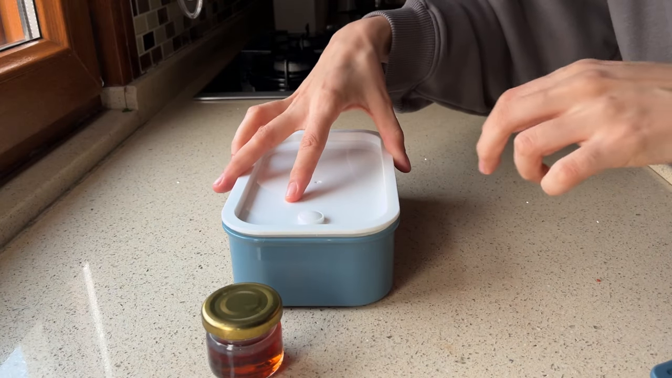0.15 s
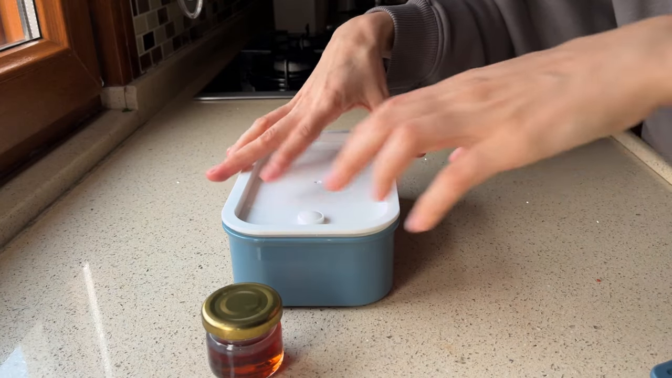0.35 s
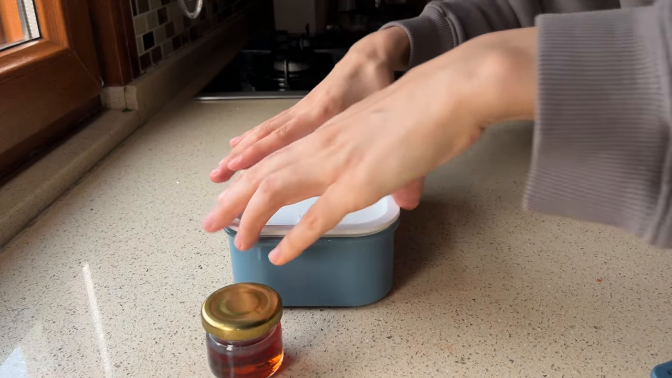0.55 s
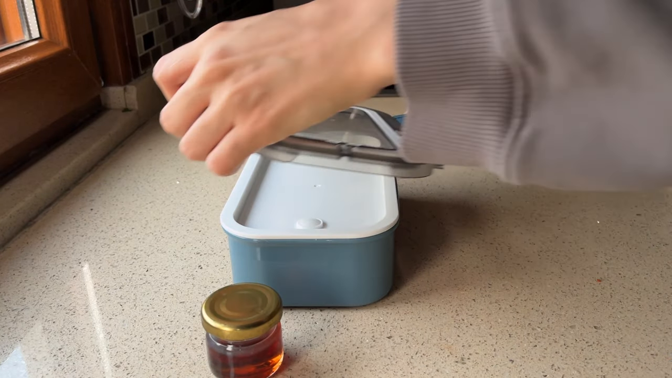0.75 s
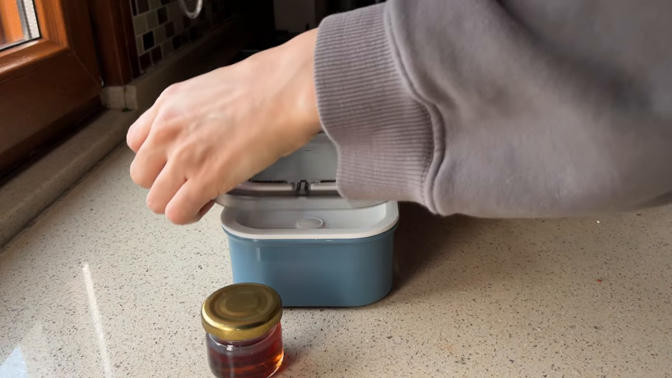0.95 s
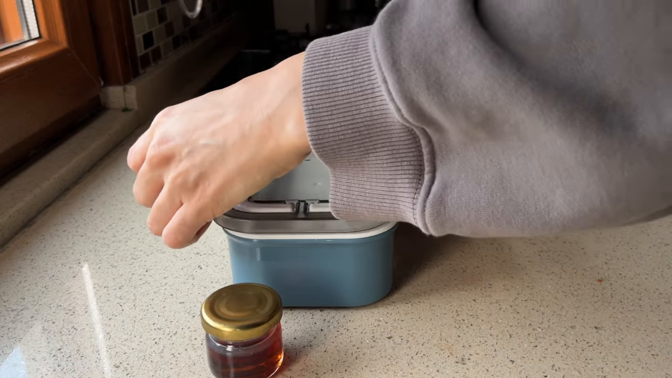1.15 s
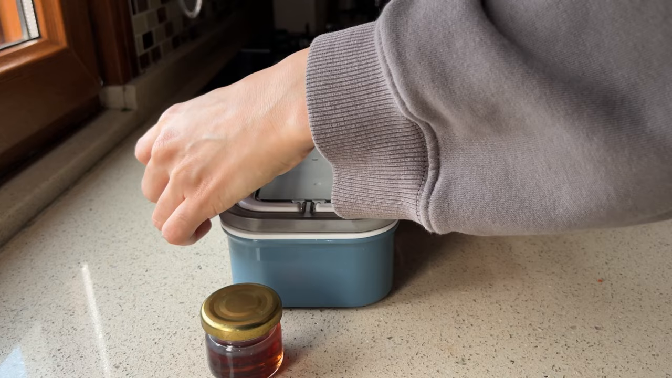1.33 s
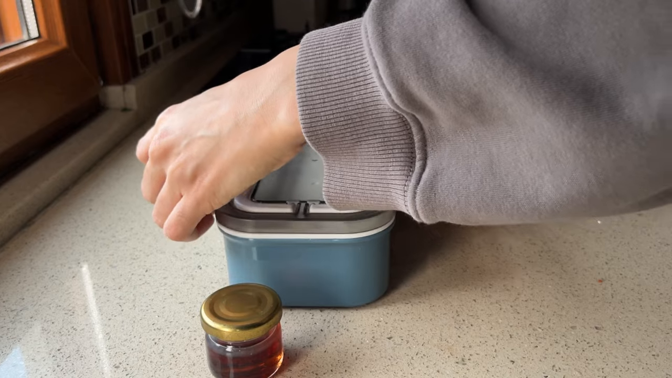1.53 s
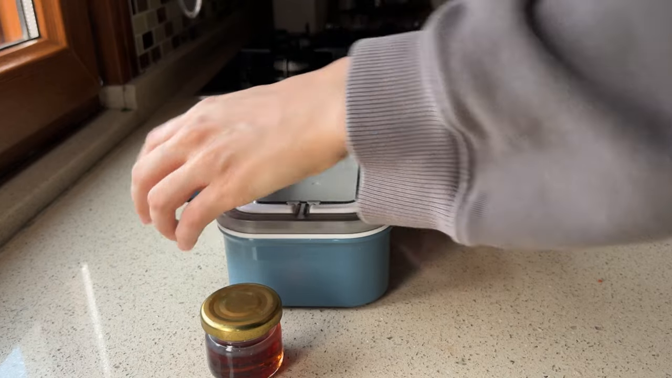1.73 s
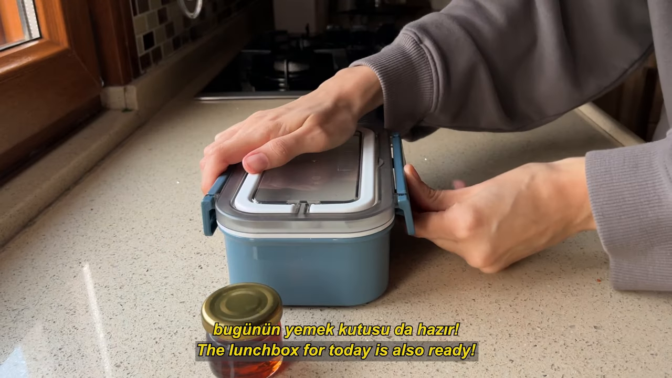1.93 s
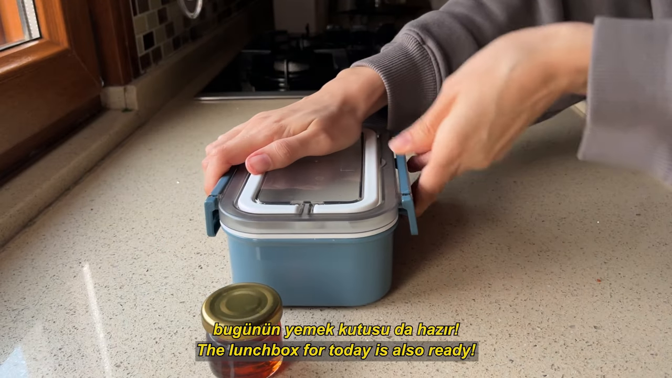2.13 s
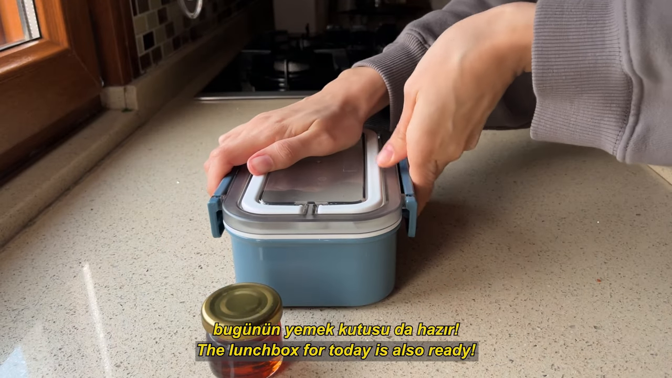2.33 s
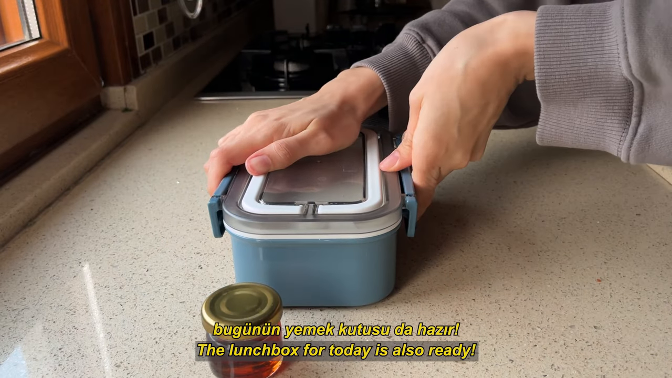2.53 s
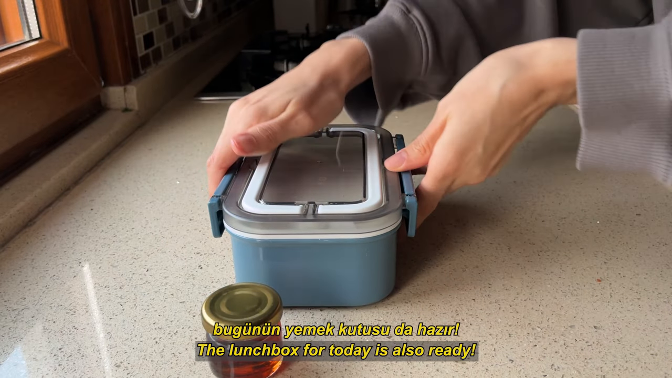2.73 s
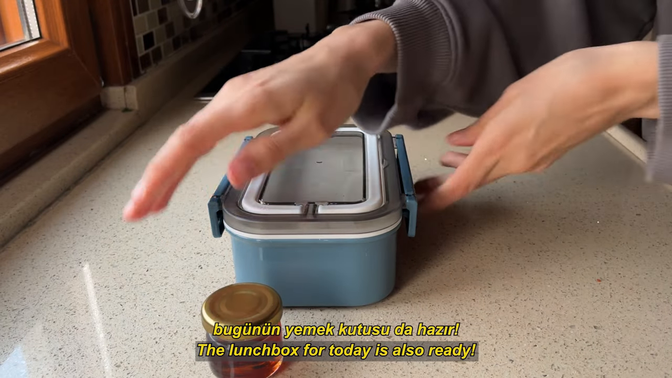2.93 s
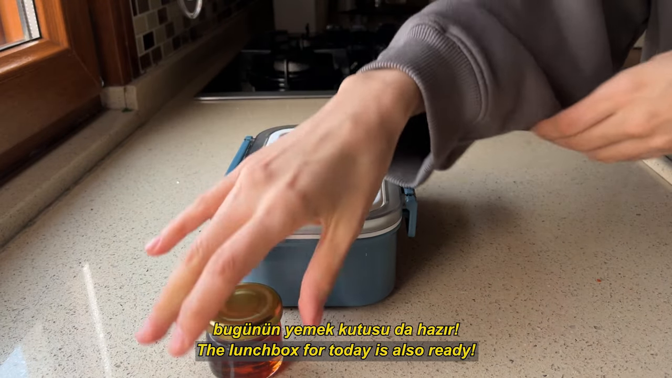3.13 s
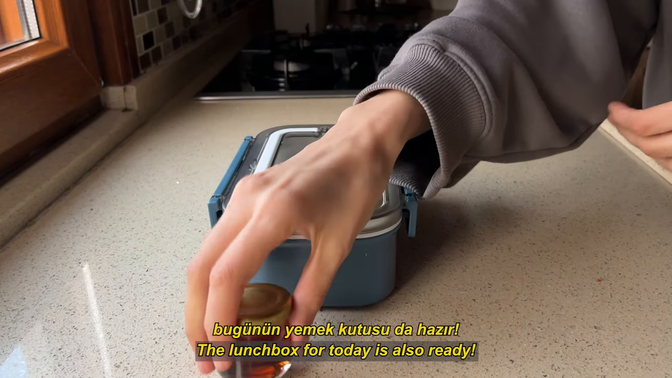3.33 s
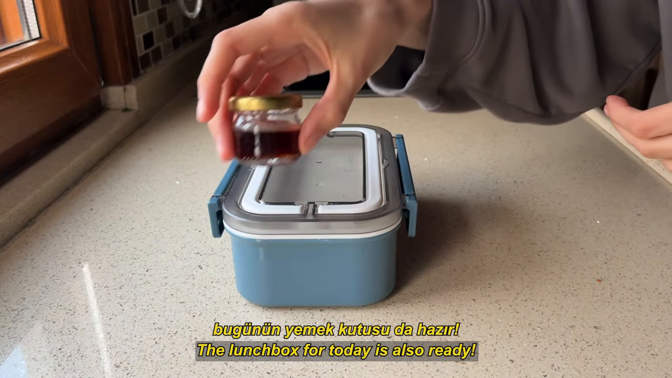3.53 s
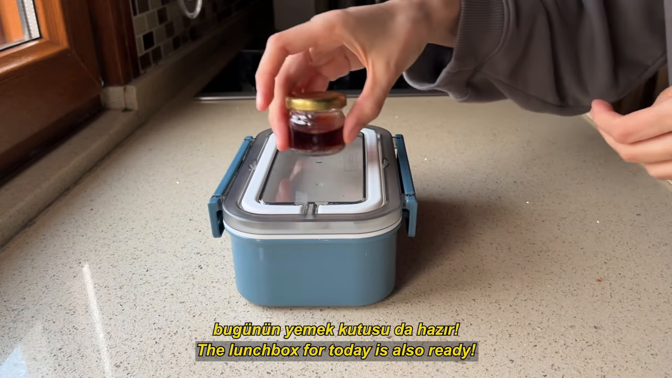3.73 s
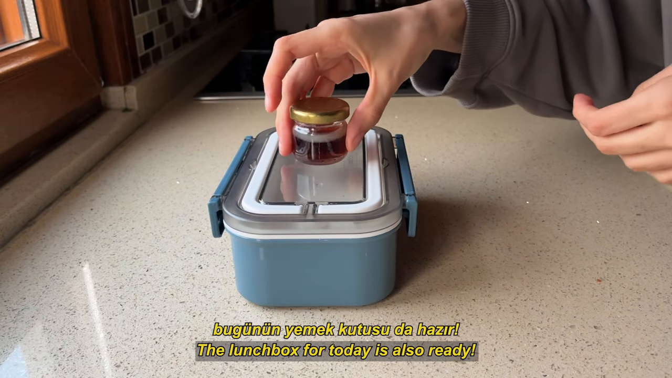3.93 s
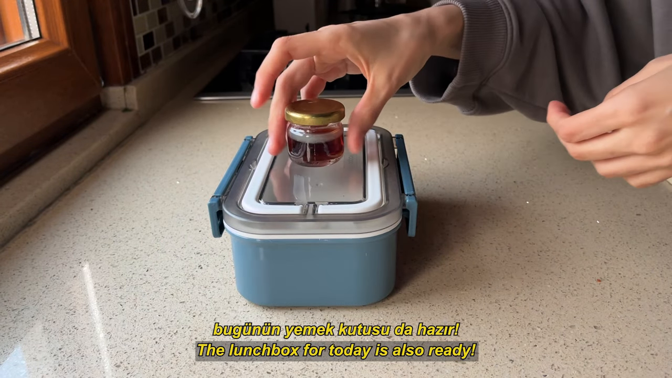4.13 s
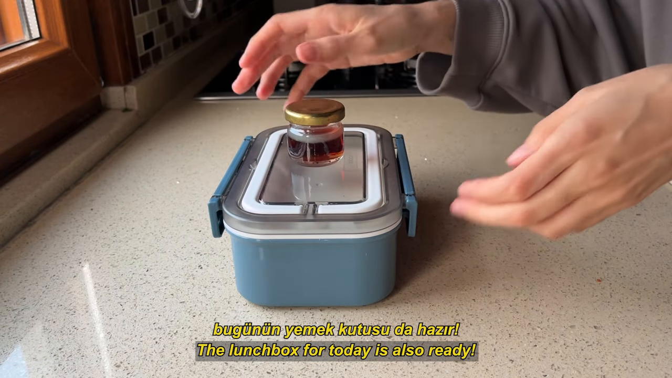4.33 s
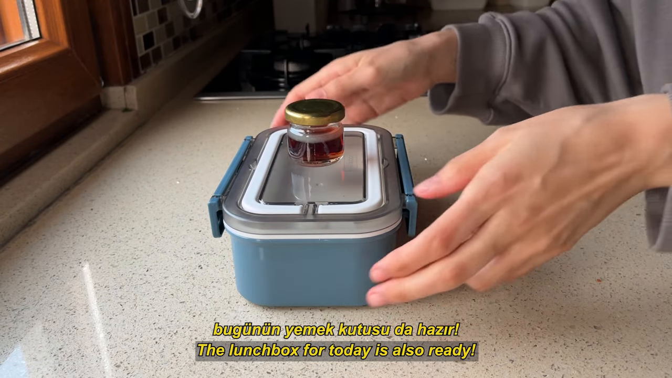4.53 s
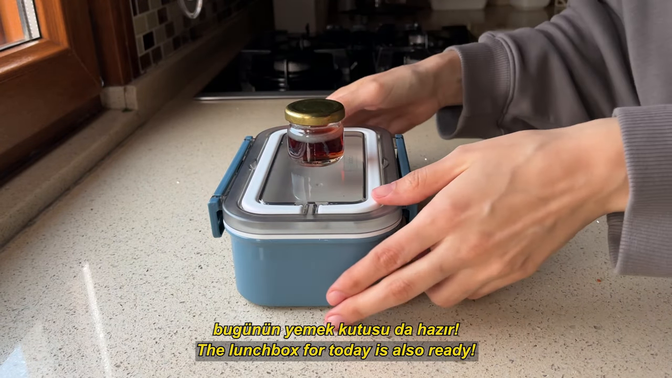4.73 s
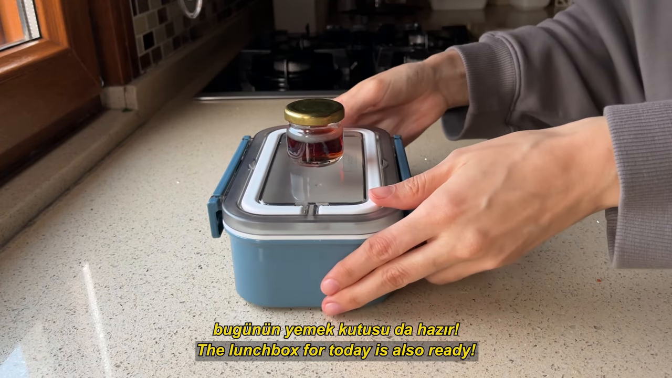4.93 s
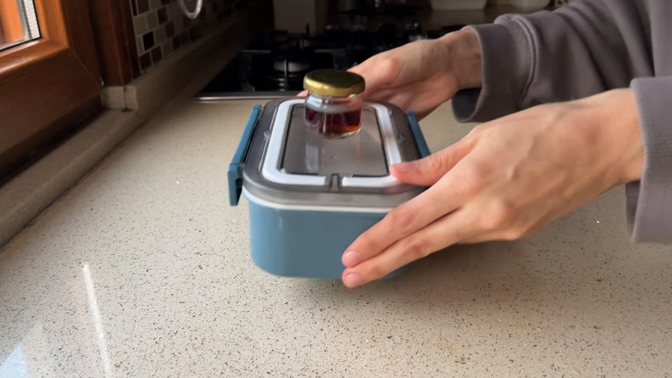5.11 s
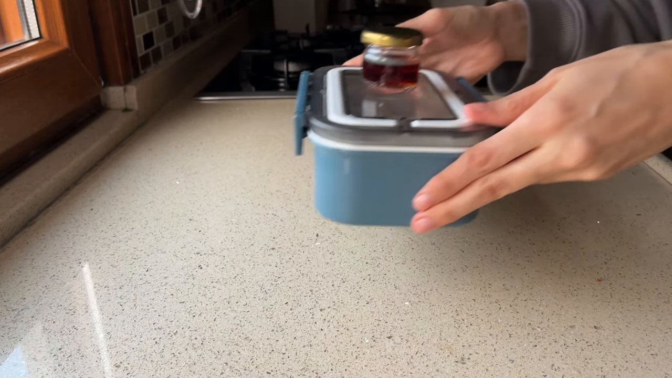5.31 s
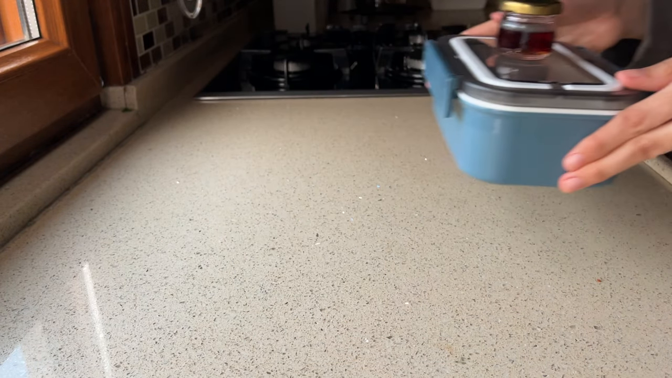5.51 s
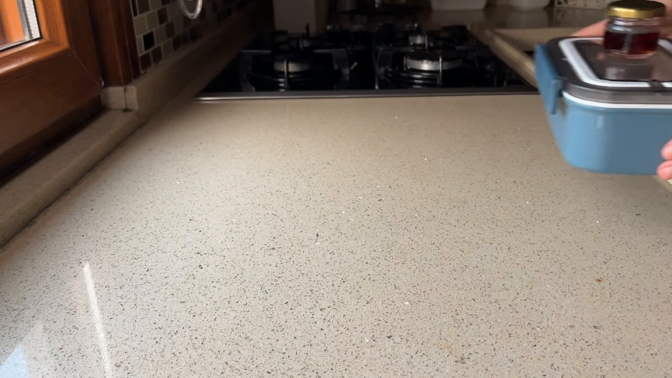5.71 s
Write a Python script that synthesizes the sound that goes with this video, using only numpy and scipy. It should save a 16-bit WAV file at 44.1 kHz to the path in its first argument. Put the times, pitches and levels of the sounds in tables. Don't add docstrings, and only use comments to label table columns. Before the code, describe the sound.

Close stereo handling sounds in a small, briefly reverberant kitchen over soft appliance rumble: dull plastic taps, a hollow lid clatter, a firm clack as it seats, slight rubs and creaks, sharp latch clicks and a dominant snap. Then quiet, a short gritty jar drag on stone, a double knock and rocking on the hollow box, and barely audible bumps as it is carried away.

```python
import sys
import numpy as np
from scipy import signal
from scipy.fft import rfft, irfft, next_fast_len
from scipy.io import wavfile

SR = 44100
rng = np.random.default_rng(int(sys.argv[2]) if len(sys.argv) > 2 else 0)


def invert_db(level):
    return 10 ** (np.asarray(level, dtype=float) / 20)


def unload_audio(sound):
    columns = np.transpose(np.atleast_2d(sound))
    steps = np.round(np.clip(columns, -1, 1) * 32767)
    wavfile.write(sys.argv[1], SR, steps.astype(np.int16))


N = 254456

# start in seconds, knock, thump and crack peaks in dB, treble in dB above the crack.
TRAY_TOUCHES = [(0.0198, -29, -45, -49, -24), (0.0262, -33.5, -63, -38.5, -24),
                (0.031, -27.5, -35.5, -60, -33), (0.0558, -30, -38, -49.5, -38),
                (0.1442, -54, -43.5, -75, -12.0), (0.1636, -57, -44, -50.5, -12),
                (0.1672, -35.5, -47, -53.5, -29), (0.337, -62, -50, -79, -1),
                (0.5427, -49.5, -46.5, -88, 5), (0.764, -58, -62, -90, -6.2),
                (0.7864, -60, -66, -62.5, 2.5)]
# frequency in Hz, level in dB, t60 in seconds.
TRAY_MODES = [(182, -3, 0.11), (300, 11, 0.025), (430, 4.5, 0.018), (617, 4.5, 0.041), (920, 6.5, 0.014),
              (1280, 8.5, 0.0079), (1910, 7, 0.013)]


def tray_settles():
    return contacts(TRAY_TOUCHES, TRAY_MODES, crack_s=0.02, push_s=0.00022, focus=1.0, scatter_db=4.5,
                    spread=0.043, best_hz=920)


# start in seconds, knock, thump and crack in dB, treble in dB above the crack.
LOOSE_TOUCHES = [
    (1.0448, -24, -37.5, -36, -12),
    (1.0732, -33.5, -33, -45, -3),
    (1.0904, -31, -38.5, -52, -14),
    (1.1042, -23.5, -48, -29, -3.5),
    (1.111, -41, -27, -38, -10),
    (1.12, -47, -52, -61, -15),
    (1.149, -69, -52, -71, -21.5),
    (1.1912, -41.5, -40, -66, 2),
    (1.228, -39, -35.5, -47, -13),
]
# frequency in Hz, level in dB, t60 in seconds.
LOOSE_MODES = [(69, 3, 0.073), (203, 6.5, 0.051), (297, 9, 0.031), (403, -3, 0.031), (626, -2, 0.029),
               (897, 0.5, 0.019), (1078, -5, 0.038), (1460, -4.5, 0.016), (1533, -7, 0.032),
               (1630, -2.5, 0.022), (1700, -3, 0.0094), (2330, -6, 0.023), (4900, -10, .007),
               (5300, -9, 0.007)]


def lid_lands():
    return contacts(LOOSE_TOUCHES, LOOSE_MODES, crack_s=0.024, push_s=0.00033, focus=1.7, scatter_db=4.5,
                    spread=0.072, best_hz=1500)


# start in seconds, knock, thump and crack in dB, treble in dB above the crack.
SEATED_TOUCHES = [(1.305, -53.5, -46.5, -81.5, 21), (1.378, -35.5, -40.5, -65.5, 2),
                  (1.388, -41.5, -36.5, -91, 8), (1.4303, -41.5, -48, -63.5, -25),
                  (1.5467, -44, -42.5, -80, -11), (1.5614, -42, -49, -71, 4),
                  (1.8249, -41, -35, -46.5, -12), (1.828, -44.5, -54, -56, -18),
                  (1.842, -38, -45, -58, -12), (2.0095, -56.5, -55, -83, 2),
                  (2.03, -54, -70.5, -54.5, -20.5)]
# frequency in Hz, level in dB, t60 in seconds.
LID_MODES = [(82.1, -12.5, 0.04), (120, -6, 0.15), (189, -2.5, 0.15), (308, -6.5, 0.037), (448, -8.5, 0.13),
             (605, 0, 0.025), (700, 1.5, 0.028), (853.3, -4.5, 0.039), (943.8, -4.5, 0.031),
             (1186.4, -6, 0.0075), (1452, -1.5, 0.013), (1890, -11, 0.032), (2062, -16.5, 0.026)]


def lid_is_pressed():
    return contacts(SEATED_TOUCHES, LID_MODES, crack_s=0.066, push_s=0.0006, focus=0.89, scatter_db=2.5,
                    spread=0.042, best_hz=849.7)


# start in seconds, knock, thump and crack in dB, treble in dB above the crack.
CLACK_TOUCHES = [
    (1.567, -44, -38, -58, -7),
    (1.5726, -21, -36, -34, 2),
    (1.58, -27.5, -25, -54, -1),
    (1.586, -33, -29.5, -54, -2),
    (1.608, -49, -42, -62, -8),
]
# frequency in Hz, level in dB, t60 in seconds.
CLACK_MODES = [(82.6, -14, 0.084), (124, -10, 0.11), (193, -4.5, 0.15), (303, -5.5, 0.035),
               (476, -10, 0.043), (595, -1.5, 0.056), (730, -7.5, 0.042), (805, 2, 0.021),
               (1020, 0.5, 0.015), (1190, 0, 0.024), (1570, -8.5, 0.013), (1970, -6.5, 0.018),
               (3570, -10, 0.012), (4370, -5, 0.01)]


def lid_clacks():
    return contacts(CLACK_TOUCHES, CLACK_MODES, crack_s=0.036, push_s=0.0007, focus=2.7, scatter_db=2.0,
                    spread=0.06, best_hz=900)


# start in seconds, knock, thump and crack in dB, treble in dB above the crack.
HOOK_TOUCHES = [
    (2.114, -52, -59.5, -70, -10),
    (2.1213, -32.5, -40.5, -42.5, -8),
    (2.124, -36, -44.5, -47.5, -7.5),
]
# frequency in Hz, level in dB, t60 in seconds.
HOOK_MODES = [(184, 0, 0.072), (300, -4, 0.035), (655, -1, .03), (845, -2.5, 0.016), (1110, -1, 0.0092),
              (1410, -2, 0.0067), (1730, -3, .015), (3300, -8, 0.012)]


def latch_hooks():
    return contacts(HOOK_TOUCHES, HOOK_MODES, crack_s=0.018, push_s=0.0006, focus=4.1, scatter_db=3.0,
                    spread=0.06, best_hz=1200)


# start in seconds, knock, thump and crack in dB, treble in dB above the crack.
LATCH_TOUCHES = [
    (2.2711, -29, -48, -25, -14),
    (2.2831, -16.5, -35.5, -19, 1),
    (2.2845, -55, -37.5, -48, -19),
    (2.3254, -19.5, -37.5, -28, -5.5),
    (2.571, -45.5, -56.5, -49, -2),
    (2.674, -55.5, -54, -79, 11.5),
    (2.7084, -51, -48, -61, 7),
    (2.7578, -64, -54, -59.5, 0),
]
# frequency in Hz, level in dB, t60 in seconds.
LATCH_MODES = [(127.2, -8, 0.04), (194, -6.5, 0.055), (314, 4.5, 0.033), (595.9, -1, 0.031),
               (710, -2, 0.022), (928.6, 1.5, 0.024), (1190, -4.5, 0.025), (1544, -5.5, 0.033),
               (1840, -12, 0.018), (3200, -3.5, 0.0091)]


def latch_clicks():
    return contacts(LATCH_TOUCHES, LATCH_MODES, crack_s=0.024, push_s=0.0008, focus=1.2, scatter_db=3.0,
                    spread=0.052, best_hz=940)


# start in seconds, knock, thump and crack in dB, treble in dB above the crack.
SNAP_TOUCHES = [
    (2.3649, -2.8, -30, -12.5, 0),
    (2.3662, -40, -50, -23, 2),
    (2.3732, -36, -45, -27, -14),
]
# frequency in Hz, level in dB, t60 in seconds.
SNAP_MODES = [(194, -5.5, 0.085), (331.7, -5, 0.055), (420, -17, 0.015), (612, -3.5, 0.024),
              (692, -2.5, 0.022), (945, 2.5, 0.0095), (1370, -4, 0.011), (1860, -17, 0.022),
              (2465, -24.5, .012), (4100, -18, 0.008), (6144, -14, .005)]


def latch_snaps():
    return contacts(SNAP_TOUCHES, SNAP_MODES, crack_s=.011, push_s=0.00015, focus=2.5, scatter_db=2.47,
                    spread=0.098, best_hz=910, opposed=True)


# start in seconds, knock, thump and crack in dB, treble in dB above the crack.
JAR_TOUCHES = [
    (3.9658, -30, -33.5, -34.5, -12),
    (3.979, -34, -35.5, -61, -11),
]
# frequency in Hz, level in dB, t60 in seconds.
JAR_MODES = [(126, -11.5, 0.15), (204, 0, 0.1), (297, -2.5, 0.045), (429, -0.5, 0.035), (510, -3, 0.023),
             (578, 1, 0.1), (617, -7, 0.04), (960, -1.5, 0.027), (1225, -9.5, 0.034), (1550, -13.5, 0.077),
             (2070, -17.5, 0.041), (2650, -26, 0.009), (3200, -6, 0.0096), (4840, -19, .008)]


def jar_lands():
    return contacts(JAR_TOUCHES, JAR_MODES, crack_s=0.029, push_s=0.0004, focus=2.3, scatter_db=0.4,
                    spread=0.0515, best_hz=1100)


# start in seconds, knock, thump and crack in dB, treble in dB above the crack.
ROCK_TOUCHES = [
    (4.048, -28.5, -37, -37, -2),
    (4.0551, -35, -37, -52, -9),
    (4.075, -56, -42.5, -70, -10),
    (4.122, -56, -51, -77, -20.5),
]
# frequency in Hz, level in dB, t60 in seconds.
ROCK_MODES = [(128, -11, 0.14), (206.5, -1, 0.065), (305, -7.5, 0.054), (431, -4, 0.045), (582, 0, 0.044),
              (947, 1, 0.025), (1176, -1, 0.023), (1680, -5, 0.024), (1990, -6.5, 0.017),
              (2550, 0.5, 0.011), (3080, -4.5, 0.02), (3180, -14, 0.015), (4040, -10, 0.018)]


def jar_rocks():
    return contacts(ROCK_TOUCHES, ROCK_MODES, crack_s=0.02, push_s=0.00079, focus=3.1, scatter_db=3.0,
                    spread=0.047, best_hz=1310)


# start in seconds, knock, thump and crack in dB, treble in dB above the crack.
LIFT_TOUCHES = [
    (4.775, -51, -60, -67.5, -4.5),
    (4.799, -64, -47, -79, -1.5),
    (4.9199, -61.5, -54, -56.5, -14.5),
    (3.2623, -47, -62, -61.5, -24),
    (3.271, -45, -62, -69.5, -22),
    (3.2922, -47, -54, -59, -24),
    (3.298, -44, -60, -66, -24),
]
# frequency in Hz, level in dB, t60 in seconds.
LIFT_MODES = [(154, -5, 0.061), (222, -7, 0.075), (337, 8.5, 0.01), (575, 2, 0.026), (960, 5, 0.026),
              (1060, 4, 0.018), (1365, 0.5, 0.012), (1770, -12.5, 0.019), (4300, -7.5, 0.015)]


def light_taps():
    return contacts(LIFT_TOUCHES, LIFT_MODES, crack_s=0.027, push_s=0.00027, focus=2.9, scatter_db=0.5,
                    spread=0.0755, best_hz=1200)


# start in seconds, knock, thump and crack in dB, treble in dB above the crack.
CARRY_TOUCHES = [
    (5.376, -55, -57.5, -71, -9.5),
    (5.381, -51, -53.5, -68.5, -14),
    (5.403, -61, -48, -76, -10),
    (5.467, -63, -60, -70, -10),
]
# frequency in Hz, level in dB, t60 in seconds.
CARRY_MODES = [(153, -7, 0.055), (200.6, -4.5, 0.088), (342, 4, 0.017), (520, 2, 0.046), (786, 4, 0.023),
               (1320, -9, .02), (2180, -1.5, .012), (2600, -4, .011), (3530, -2, .008)]


def box_is_carried():
    return contacts(CARRY_TOUCHES, CARRY_MODES, crack_s=0.03, push_s=0.0012, focus=2.5, scatter_db=2.5,
                    spread=0.07, best_hz=1300)


def contacts(events, modes, crack_s, push_s, focus, scatter_db, spread, best_hz, opposed=False):
    sharp_octaves_per_db, usual_sharp_db = .012, -11.5
    hollow_swell_s = 0.0035
    sideways = .33
    out = np.zeros((4, N + SR))
    t = np.arange(SR // 5) / SR
    hz, db, t60 = np.transpose(modes)[:, :, None]
    hollow = hz[:, 0] < 400
    swell_s = np.where(hollow[:, None], hollow_swell_s, push_s)
    for s, knock_db, thump_db, crack_db, treble_db in events:
        chance = rng.standard_normal((3, len(modes), 1))
        noise = rng.standard_normal(2048)
        sign = (-1) ** np.arange(len(modes))[:, None] if opposed else np.sign(chance[2])
        sharp_hz = best_hz * 2 ** (sharp_octaves_per_db * (crack_db - knock_db - usual_sharp_db))
        weight = np.where(hollow[:, None], 1, bell(sharp_hz, focus)(hz))
        gain = sign * invert_db(db + scatter_db * chance[0]) * weight
        wave = np.exp(2j * np.pi * hz * (1 + 0.011 * chance[1]) * t)
        ring = gain * wave * fade(t, t60) * (1 - np.exp(-t / swell_s))
        knock = ring[~hollow].imag.sum(0)
        thump = ring[hollow].imag.sum(0)
        knock_gain = invert_db(knock_db) / abs(knock).max()
        thump_gain = invert_db(thump_db - 0.5) / abs(thump).max()
        skew = sideways * np.tanh(noise[-len(modes):, None]) * ring.real
        i = int(s * SR)
        out[0, i:i + len(t)] += knock_gain * knock + thump_gain * thump
        out[3, i:i + len(t)] += knock_gain * skew[~hollow].sum(0)
        snap = crack(noise, treble_db, spread * invert_db(1.5 * noise[0]), crack_s)
        out[1:3, i - 30:i + 2018] += invert_db(crack_db) * snap
    return out[:, :N]


# frequency in Hz, level in dB.
CRACK_SPECTRUM = [(900, -28.5), (1800, -4), (2900, -3), (4100, -3.5), (6000, -6), (8300, -1), (10000, -7),
                  (12500, -18), (15000, -9), (16800, -34.5)]


def crack(noise, treble_db, spread, crack_s):
    t = np.arange(len(noise)) / SR
    smear = lambda hz: np.exp(-4j * np.pi * spread * (np.sqrt(hz) - hz / 200))
    click = colour(np.roll(t == 0, 32) * 1., smear)
    rattle = noise * (t >= 32 / SR) * (0.093 * fade(t, crack_s) + 0.0084 * fade(t, 4.7 * crack_s))
    both = colour(np.array([click, rattle]), lambda hz: invert_db(on_log(hz, CRACK_SPECTRUM)))
    top = colour(both, lambda hz: 1 / (1 + (6000 / np.maximum(hz, 1)) ** 5))
    body = both - top
    return body / abs(body.sum(0)).max() + invert_db(treble_db) * top / abs(top.sum(0)).max()


# start in seconds, length in seconds,
# rub level in dB, fine hiss in dB above the rub, creak of the panels in dB above the rub.
SLIDES = [(-.02, 0.064, -77.5, -8, 19.5), (3.227, 0.064, -69, -14.5, -11), (0.3, 0.26, -87, 1.5, -16),
          (1.231, 0.063, -91, 10, -3), (1.77, 0.065, -86.5, 2, -3), (2.025, 0.031, -71.5, -7.5, 7),
          (2.092, 0.048, -79, 4, 13.5), (2.133, 0.12, -79, -2.5, 8.5), (2.676, .12, -72, -4, -8.5),
          (3.11, 0.088, -81, -6, 1.5), (3.392, 0.091, -95.5, 3, 5), (4.917, 0.062, -77.5, -9, 10),
          (5.12, 0.047, -83.5, -25.5, 4.5), (5.33, 0.053, -79, -5, 0.5)]
LET_GO = [
    (.54, 0.032, -85.5, -10, 21.4),
    (1.831, 0.12, -61.5, -10.5, 10.8),
    (2.578, .11, -64.5, -9.5, 1.9),
    (5.379, 0.15, -80, 1, 7.2),
]
PRESS_IN = [
    (.125, 0.042, -85.5, -19, 14),
    (1.028, 0.014, -95, -24, 23.5),
    (1.536, 0.042, -75.5, -7.5, 0),
    (2.002, 0.039, -85, -6, -2),
    (2.256, .011, -80, -11.5, 12),
    (2.341, 0.017, -68, -22.5, -19),
]


def rubbing():
    hiss = unit(colour(grit(12000, 1.6), bell(11500, 0.3)))
    rub = unit(colour(grit(7000, 2.3), bell(3300, 0.76)))
    creak = unit(colour(grit(3000, 2.5), bell(980, 0.76)))
    slide_edge_s = .022
    gains = np.vstack([strokes(SLIDES, slide_edge_s, slide_edge_s, sag_db=-0.5),
                       strokes(LET_GO, 0.0063, slide_edge_s, sag_db=27),
                       strokes(PRESS_IN, 0.0053, 0.0053, sag_db=-18)])
    hiss_db, creak_db = np.vstack([SLIDES, LET_GO, PRESS_IN])[:, -2:].T
    return hiss * (invert_db(hiss_db) @ gains) + invert_db(-5.5) * rub * gains.sum(0) + creak * (invert_db(creak_db) @ gains)


# start in seconds, length in seconds, level in dB.
DRAG_STROKES = [
    (3.238, 0.038, -51),
    (3.252, 0.063, -39.5),
    (3.31, 0.12, -59.5),
]
# frequency in Hz, width in Hz, level in dB.
DRAG_RING = [(606, 97, 2), (897, 110, 7.5), (1400, 40, -6), (1650, 200, -6), (1930, 59, -11),
             (2300, 78, -7.5)]


def jar_drag():
    foot = skid(DRAG_RING, rate=4400, top_hz=2450, between=0.089)
    return foot * strokes(DRAG_STROKES, 0.012, 0.012, sag_db=15.5).sum(0)


# start in seconds, length in seconds, level in dB.
SCUFF_STROKES = [
    (2.027, 0.027, -68.5),
    (4.916, 0.05, -67),
]
# frequency in Hz, width in Hz, level in dB.
SCUFF_RING = [(798.3, 150, -3.5), (1447, 90, 3.5), (1960, 96, 6), (2606, 150, -9), (3040, 195, -19),
              (4194, 270, -7.5)]


def box_scuff():
    edge = skid(SCUFF_RING, rate=5500, top_hz=4670, between=0.061)
    return edge * strokes(SCUFF_STROKES, 0.0071, 0.0071, sag_db=-1.5).sum(0)


def skid(rings, rate, top_hz, between):
    peaks = lambda hz: abs(sum(invert_db(db) / (1 + 1j * (hz - f) / (w / 2)) for f, w, db in rings))
    limits = lambda hz: hz ** 2 / (hz ** 2 + 450 ** 2) / (1 + (hz / top_hz) ** 6)
    return unit(colour(grit(rate, 1.4), lambda hz: (between + peaks(hz)) * limits(hz)))


def grit(rate, scatter_db):
    slips = (rng.random(N) < rate / SR) * rng.standard_normal(N)
    return slips * invert_db(scatter_db * rng.exponential(size=N))


def strokes(rows, attack_s, release_s, sag_db):
    start, length, db = np.array(rows)[:, :3].T[:, :, None]
    t = np.arange(N) / SR - start
    edge = np.clip(np.minimum(t / attack_s, 1 + (length - t) / release_s), 0, 1)
    return edge ** 2 * invert_db(db - sag_db * np.clip(t / length, 0, 1))


# frequency in Hz, level in dB, t60 in seconds.
ROOM_BANDS = [(139, -15, 0.37), (393.6, -15.5, 0.36), (640, -22, .32), (1030, -24.5, 0.39), (1500, -20, .3),
              (2120, -21.5, 0.3), (3800, -18.5, 0.27), (7310, -26, 0.3), (12000, -19, 0.12)]
ROOM_SHARE_DB = [-1, 0.5, 2.5]


def kitchen(parts):
    t = np.arange(SR // 2) / SR
    onset = np.clip((t - .002) / 0.0017, 0, 1)
    tail = 0
    for hz, db, t60 in ROOM_BANDS:
        band = unit(colour(rng.standard_normal((3, 2, len(t))), bell(hz, 0.41))) * np.sqrt(hz / SR)
        tail = tail + invert_db(db) * band * fade(t, t60) * onset
    sent = invert_db(np.array(ROOM_SHARE_DB))[:, None, None] * parts[:, None]
    answer = signal.fftconvolve(sent, tail, axes=2).sum(0)[:, :N]
    return diffuse(answer * invert_db(-14.5))


# frequency in Hz, level in dB per Hz.
HUM_SPECTRUM = [(25, -21.5), (45, 1), (62, 2.5), (120, -0.5), (160, -11), (200, -9.5), (310, -20),
                (500, -26), (850, -21), (1300, -37), (4000, -46.5), (8300, -50.5), (12600, -53.5),
                (13600, -65)]
# middle in seconds, spread in seconds, added rumble in dB.
LEANS = [
    (.14, 0.092, 5),
    (.58, 0.076, 6.5),
    (1.12, 0.045, 10.5),
    (1.6, 0.32, 2.5),
    (2.32, 0.11, 8),
    (4.1, 0.12, 2),
    (4.8, .2, 1.5),
    (5.43, 0.072, 2.5),
]


def hum():
    shape = lambda hz: invert_db(on_log(hz, HUM_SPECTRUM))
    low = colour(rng.standard_normal((2, N)), lambda hz: shape(hz) * (hz < 250))
    rest = colour(rng.standard_normal((2, N)), lambda hz: shape(hz) * (hz >= 250))
    t = np.arange(N) / SR
    lean_db = sum(db * np.exp(-.5 * ((t - s) / spread_s) ** 2) for s, spread_s, db in LEANS)
    return diffuse(unit(low) * invert_db(-57.5 + lean_db) + unit(rest) * invert_db(-74.5 + 3.0))


# frequency in Hz, right's lead in radians, left minus right in dB,
# likeness of diffuse sound from 0 to 1.
PORTS = [(60, 0, 1.3, .97), (350, -.15, 1.2, .8), (700, -.3, .6, .35), (1500, .1, 1, .05),
         (2400, -.7, 2.2, .3), (4400, -1.2, 5, .25), (5500, .8, 4, .2), (6900, 1.6, 1.5, .5),
         (7500, 2.2, 1, .8), (8100, 3.0, 0, .95), (8850, 3.3, 0, .96), (9650, 4.35, -.3, .65),
         (11300, 6.1, 0, .85), (13100, 6.9, 0, .6), (14500, 8.55, .5, .9), (15500, 9.25, 0, .97),
         (16500, 9.4, 0, .97)]


def diffuse(pair):
    like = lambda hz: np.clip(on_log(hz, PORTS, order=3), 0, .999)
    mid = colour(pair[0], lambda hz: np.sqrt((1 + like(hz)) / 2))
    side = colour(pair[1], lambda hz: np.sqrt((1 - like(hz)) / 2))
    return np.array([mid + side, mid - side])


def on_log(hz, table, order=1):
    table = np.array(table, float)
    return np.interp(np.log(np.maximum(hz, 1)), np.log(table[:, 0]), table[:, order])


def colour(x, gain):
    size = next_fast_len(x.shape[-1])
    hz = np.arange(size // 2 + 1) * SR / size
    return irfft(rfft(x, size) * gain(hz), size)[..., :x.shape[-1]]


def bell(centre_hz, octaves):
    return lambda hz: np.exp(-.5 * (np.log2(np.maximum(hz, 1) / centre_hz) / octaves) ** 2)


def unit(x):
    return x / np.sqrt(np.mean(x ** 2))


def fade(t, t60):
    return np.exp(-np.log(1000) * t / np.maximum(t60, 1e-3))


def scene():
    box = tray_settles() + lid_lands() + lid_is_pressed() + lid_clacks()
    box += latch_hooks() + latch_clicks() + latch_snaps()
    box += jar_lands() + jar_rocks() + light_taps() + box_is_carried()
    box[2] += rubbing() + jar_drag() + box_scuff()
    near = box[:3].sum(0)
    difference = box[3] * np.array([[1], [-1]])
    echo = np.array([0.081 * np.roll(near, 57), 0.1 * np.roll(near, 83)])
    return near + difference + echo + kitchen(box[:3]) + hum()


def band_limit(x):
    return signal.sosfilt(signal.butter(12, 16820, fs=SR, output="sos"), x)


def record(dry):
    reach = lambda hz: hz ** 2 / (hz ** 2 + 42 ** 2) / (1 + (hz / 16400) ** 24)
    twist = lambda hz: invert_db(on_log(hz, PORTS, order=2) / 2) * np.exp(-1j * on_log(hz, PORTS) / 2)
    left = colour(dry[0], twist)
    right = colour(dry[1], lambda hz: 1 / twist(hz))
    return band_limit(colour(np.array([left, right]), reach))


dry = scene()
out = record(dry)
unload_audio(out)
```